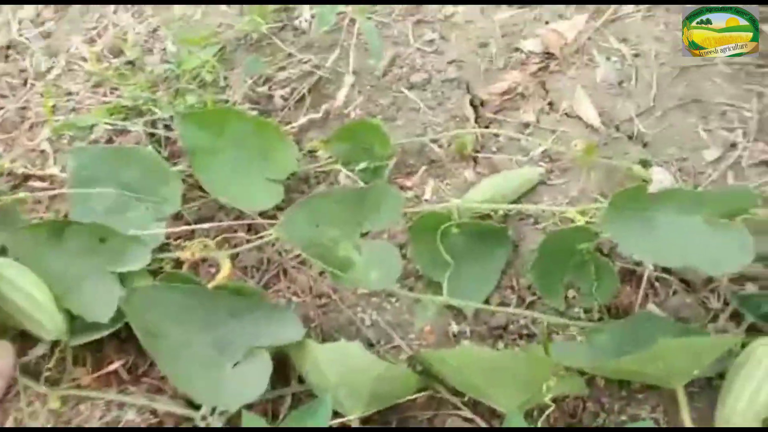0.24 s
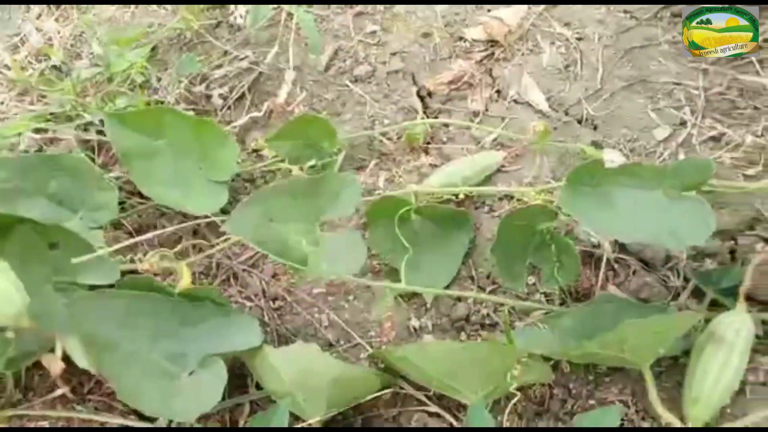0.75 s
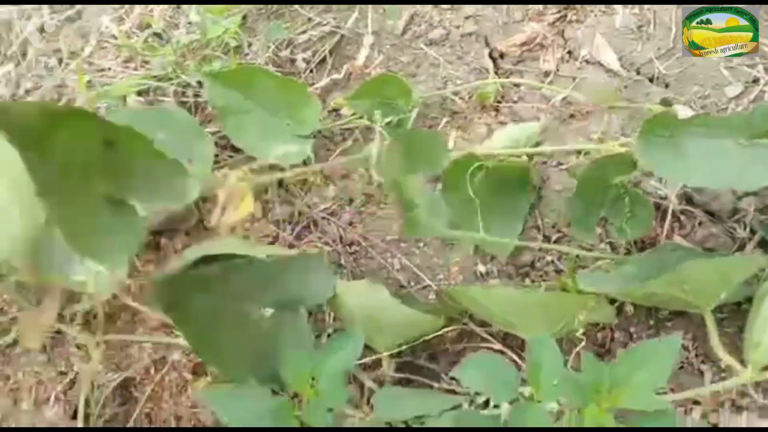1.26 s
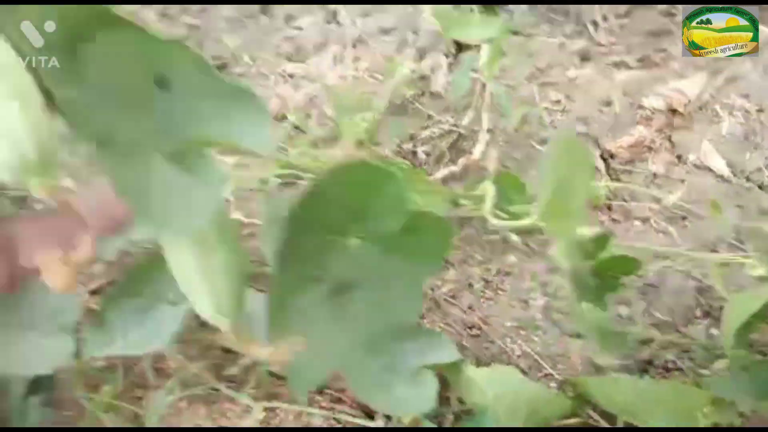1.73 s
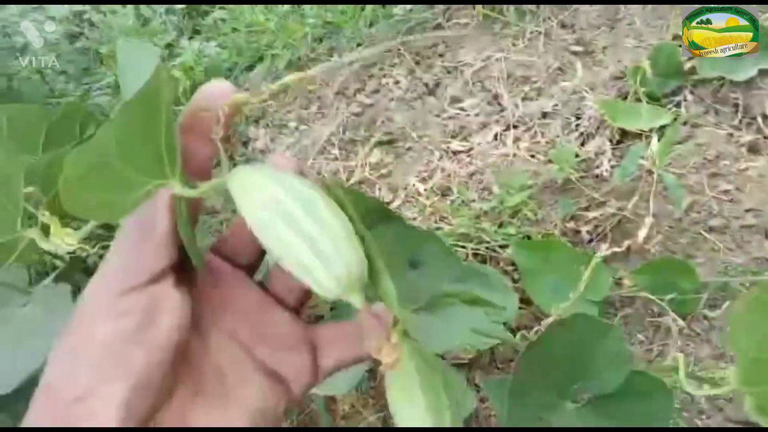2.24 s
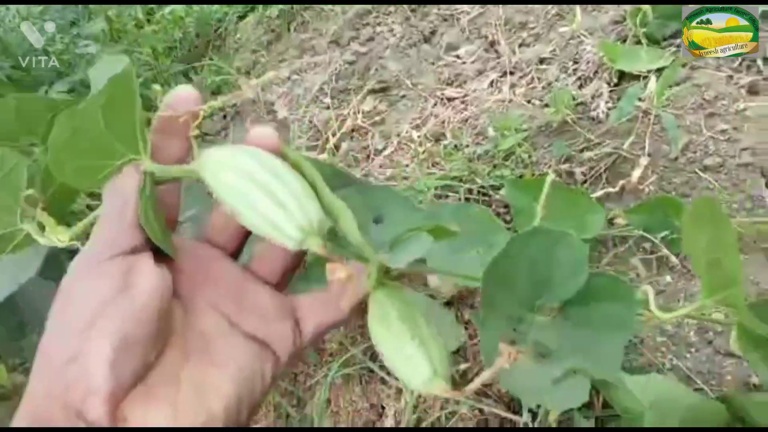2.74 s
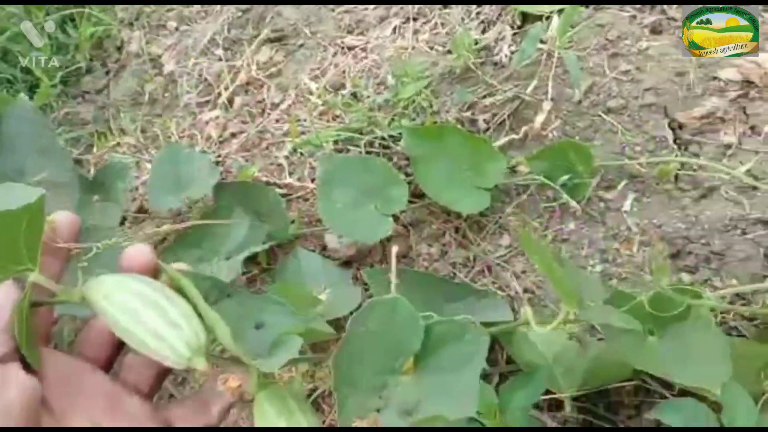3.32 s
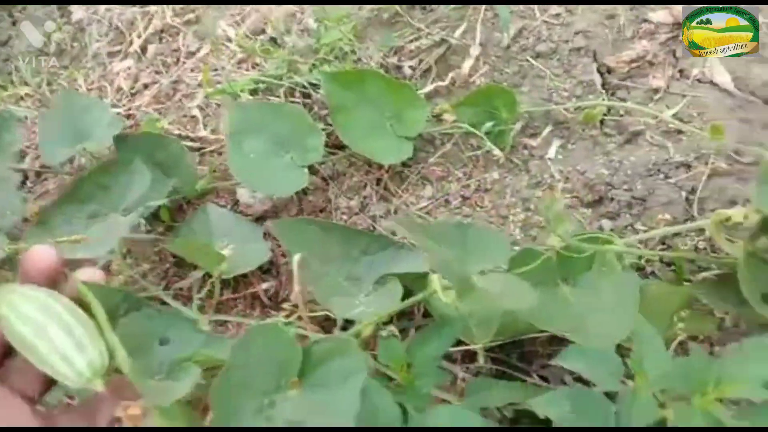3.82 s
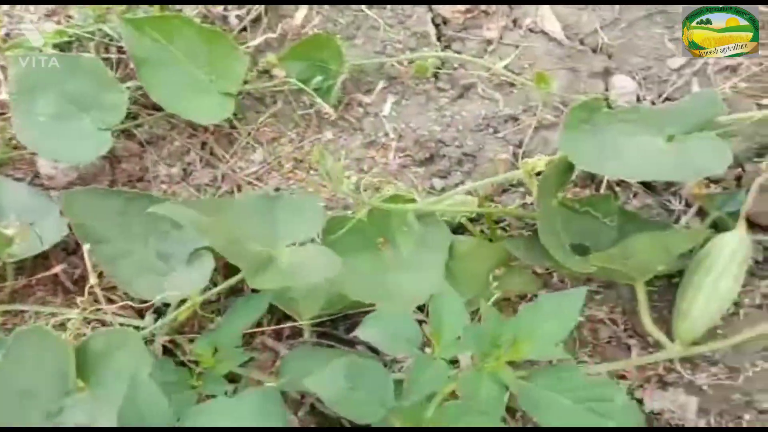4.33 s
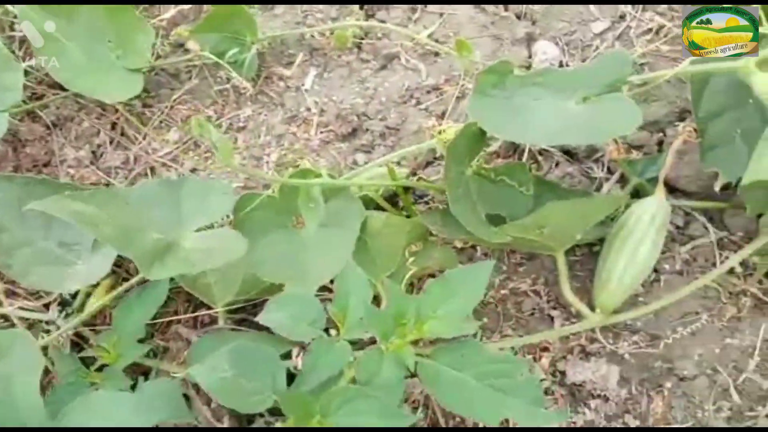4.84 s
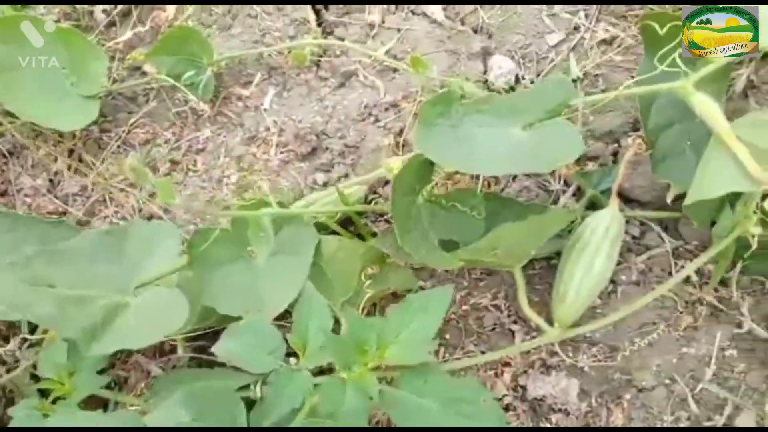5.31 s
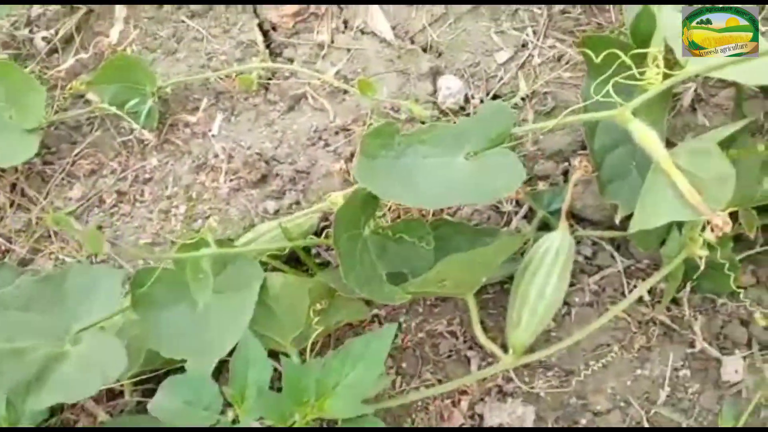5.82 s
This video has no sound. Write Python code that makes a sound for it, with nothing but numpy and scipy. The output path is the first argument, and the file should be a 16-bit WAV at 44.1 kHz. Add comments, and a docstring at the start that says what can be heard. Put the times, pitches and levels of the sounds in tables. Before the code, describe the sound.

Close, dry leaf handling in an open field: short scrapes with crackling fibres and twig-like snaps crowd the first second and a half, then thin to sparse faint ticks. Midway, a tiny hollow knock and a brief squeaky creak follow a few snaps. Steady fluttering insects, quiet air, a soft low wind thump on the microphone and distant chirping birds fill the calmer remainder, with no reverberant room sound.

```python
"""A hand pushes into a gourd vine on dry ground, lifts a fruit and lets it down again.
Leaves scrape as trains of tiny slips that ring the blade; dry bits snap as resonant click clusters.
A stem creaks by stick-slip through gliding resonances, and the fruit knocks as a short hollow ring.
Faint litter ticks and far whistling birds lie behind, with insects as a fluttering band of noise.
Shaped noise makes the still air and the light wind that bumps the microphone."""
import sys
import numpy as np
from scipy import signal
from scipy.fft import rfft, irfft, next_fast_len
from scipy.io import wavfile

SR = 44100
rng = np.random.default_rng(int(sys.argv[2]) if len(sys.argv) > 2 else 0)


def to_wav(s):
    """Save 16-bit WAV."""
    ch = np.atleast_2d(s).T  # columns
    pcm = np.round(np.clip(ch, -1, 1) * 32767)  # PCM
    wavfile.write(sys.argv[1], SR, pcm.astype(np.int16))


N = 267334
TIME = np.arange(N) / SR


def vine(scatter_db=-14):
    """Everything that the hand disturbs, with a short scatter from the ground."""
    close = leaf_strokes() + snaps()
    add(close, *creak())
    add(close, *knock())
    return close + gain_of(scatter_db) * echoes(close, 0.039)


# leaves sliding, one stroke per row: start_s, rise_s (time to full pressure), length_s,
# level_db (at full pressure), pitch_hz (of the leaf), hiss_db (treble lift from the leaf hairs)
LEAF_STROKES = [(0.021, 0.024, 0.037, -59, 3030, 8), (.19, .01, 0.035, -64.5, 1950, -20),
                (0.273, 0.0028, 0.06, -51, 1970, -25), (0.306, 0.018, 0.059, -46, 1530, -10),
                (0.369, 0.023, 0.13, -50, 1700, -9), (0.492, .002, 0.037, -35.5, 1940, -0.5),
                (0.529, .07, 0.15, -41.5, 2050, -2.5), (0.671, .01, 0.054, -48, 1760, -20),
                (.782, 0.0047, 0.097, -54, 1980, 11.5), (0.884, 0.0069, 0.034, -47, 1950, -34),
                (0.976, 0.013, .058, -41, 2170, 0.5), (1.051, .01, 0.1, -55.5, 1970, 3),
                (1.145, 0.034, 0.097, -40, 2150, 7), (1.239, 0.067, 0.075, -33, 2670, -2),
                (1.324, .024, 0.093, -30.5, 1980, 3), (1.584, 0.036, 0.041, -49.5, 3080, -5),
                (1.634, 0.0083, 0.041, -41.5, 2650, -4.5), (1.688, 0.006, 0.016, -50.5, 3130, -14),
                (1.807, .01, 0.087, -63.5, 3800, 5), (2.043, .004, 0.027, -57, 3640, 2),
                (2.112, 0.0027, 0.018, -63, 2840, 4), (2.358, 0.014, 0.055, -62.5, 3470, 5),
                (2.574, .01, 0.089, -68, 2110, 5), (2.886, 0.0092, 0.033, -66, 3080, -14),
                (3.297, 0.0046, 0.053, -55, 3430, 7), (4.078, .01, 0.058, -68, 2250, -3),
                (4.322, 0.0077, 0.097, -69.5, 2380, -7), (5.005, .015, 0.08, -66, 1685, 2.5),
                (5.177, .08, 0.097, -58, 2940, 4), (5.239, .06, .08, -57, 1860, 2),
                (5.33, 0.0093, 0.06, -64.5, 1920, 12)]


def leaf_strokes():
    """Leaves dragged over each other, with fibres crackling under the pressure."""
    out = np.zeros(N)
    for start_s, rise_s, length_s, level_db, pitch_hz, hiss_db in LEAF_STROKES:
        add(out, *stroke(start_s, rise_s, length_s, level_db, pitch_hz, hiss_db))
        for crackle in crackles(start_s, rise_s, length_s, level_db, pitch_hz):
            add(out, *snap(*crackle))
    return out


FIRM_DB, LIGHT_RANGE_DB = -38.5, 12  # a touch this far under a firm one only grazes the leaf
SWELL_DB, SAG_DB_PER_S = 7, 24.5  # pressure builds, then eases while the leaf slides
LET_GO_DB, SETTLE_DB_PER_S, SETTLE_S = 8.5, 174, .2  # the leaf slips free and rustles to rest
# colour of the rubbed leaves: freq_hz, level_db (relative)
LEAF_COLOUR = [(120, -40), (230, -30), (330, -13.5), (430, -25), (600, -8), (790, -5.5), (1030, -12),
               (1330, -3), (2400, -0.5), (2950, -7.5), (3650, -1.5), (6300, -13.5), (9700, -11),
               (13500, -27), (15500, -17.5)]


def stroke(start_s, rise_s, length_s, level_db, pitch_hz, hiss_db,
           body_db=6, soft_body_db=7, octaves=0.55, soft_octaves=0.28, tick=0.49, ring_s=0.004,
           shift_db=9, judder_db=2, soft_s=0.0053, free_s=0.0094, landing=0.15, dull_db=-9):
    """Slips ring three wandering patches of the blade; hair hiss dulls once the leaf slips free."""
    t = np.arange(round((length_s + SETTLE_S) * SR)) / SR
    # a light touch starts softly and rings mostly the leaf's own pitch
    light = np.clip((FIRM_DB - level_db) / LIGHT_RANGE_DB, 0, 1)
    contact = np.minimum(t / (landing * rise_s + light * soft_s), 1)

    held_s = np.maximum(t - rise_s, 0)
    swell_db = SWELL_DB * np.maximum(1 - t / rise_s, 0)
    pressure_db = level_db - swell_db - SAG_DB_PER_S * held_s + judder_db * wander(t, 157.9)
    freed_s = np.maximum(t - length_s, 0)
    free = np.minimum(freed_s / free_s, 1)
    release_db = LET_GO_DB * free + SETTLE_DB_PER_S * freed_s

    # the contact wanders from patch to patch
    weights = gain_of(shift_db * np.array([wander(t, 24.9) for _ in range(3)]))
    weights /= np.linalg.norm(weights, axis=0)
    trains = [weight * slips(t, 2200 - 1600 * light, 3.3) for weight in weights]
    patches = [signal.fftconvolve(train, blade(ring_s))[:len(t)] for train in trains]
    scrape = unit_rms(sum(patches)) + tick * unit_rms(sum(trains))

    def rubbed(treble_db):
        """The slips in the colour of this leaf."""
        def blade_db(f):
            away = np.log2((f + 1) / pitch_hz)
            body = body_db * np.exp(-.5 * (away / octaves) ** 2)
            soft_body = light * soft_body_db * np.exp(-.5 * (away / soft_octaves) ** 2)
            treble = treble_db * f ** 6 / (f ** 6 + 6500. ** 6)  # shelf centred on 6.5 kHz
            return read(LEAF_COLOUR, f) + body + soft_body + treble
        return unit_rms(colour(scrape, blade_db))

    sound = (1 - free) * rubbed(hiss_db) + free * rubbed(hiss_db + dull_db)
    return start_s, sound * gain_of(pressure_db - release_db) * contact


def slips(t, per_s, spread_db):
    """Tiny catches of leaf on leaf: impulses of random sign, many small, a few large."""
    size = gain_of(spread_db * np.minimum(rng.exponential(1, len(t)), 4))
    return size * rng.choice([-1, 1], len(t)) * (rng.random(len(t)) < per_s / SR)


def blade(ring_s):
    """One patch of leaf: dense modes as a noise burst that decays to 1/e in ring_s."""
    t = np.arange(SR // 40) / SR
    return unit_rms(rng.standard_normal(len(t)) * np.exp(-t / ring_s))


CRACKLES_PER_S = 30  # while a stroke presses fully
CRACKLE_DB, CRACKLE_SPREAD_DB = 4.5, 21.5  # loudest peak relative to the stroke, range below it


def crackles(start_s, rise_s, length_s, level_db, pitch_hz, octaves=1.0, count=12):
    """Small fibres break by chance under full pressure: rows of (start_s, peak_db, pitch_hz)."""
    held_s = length_s - rise_s
    rows = []
    for chance, when, size, pitch in rng.random((count, 4)):
        if chance < CRACKLES_PER_S * held_s / count:
            peak_db = level_db + CRACKLE_DB - CRACKLE_SPREAD_DB * size
            rows.append((start_s + rise_s + when * held_s, peak_db,
                         pitch_hz * 2 ** (octaves * (pitch - .5))))
    return rows


# dry bits snapping: start_s, peak_db (before the shared trim), pitch_hz
DRY_SNAPS = [(0.103, -52.5, 4100), (0.2772, -44, 2170), (.4188, -34, 1750), (0.4574, -33.5, 1410),
             (0.5093, -22.5, 1420), (.5397, -28.5, 2360), (.7143, -35, 1780), (0.7926, -42, 1940),
             (0.8933, -30, 1860), (.986, -25.5, 2170), (1.022, -27.5, 2070), (1.0856, -39, 1890),
             (1.2424, -24, 1780), (1.3029, -17, 2600), (1.6108, -35, 3380), (1.6448, -29.5, 3730),
             (1.6527, -22, 3280), (1.8602, -43.5, 3660), (2.191, -55, 1020), (2.3882, -46, 3380),
             (2.996, -45, 2245), (3.1365, -52, 4940), (3.3029, -36.5, 3010), (3.3235, -30.5, 3170),
             (3.333, -36, 3030), (3.344, -42, 3750), (4.4498, -52.5, 2800), (5.0267, -45, 1440),
             (5.3094, -46, 1956), (5.3744, -50, 1950)]


def snaps(trim_db=-1):
    """Dry bits of the vine break one by one."""
    out = np.zeros(N)
    for start_s, peak_db, pitch_hz in DRY_SNAPS:
        add(out, *snap(start_s, peak_db + trim_db, pitch_hz))
    return out


def snap(start_s, peak_db, pitch_hz, width_hz=500, crack=0.11, crumble_s=0.0034, edge_hz=5200):
    """A fibre breaks in a quick burst that rings the leaf; the soft blade damps the highs."""
    breaks = blade(crumble_s)
    broad = resonate(np.diff(breaks, prepend=0), pitch_hz, 3 * width_hz)
    ring = unit_rms(resonate(broad, pitch_hz, width_hz))
    ring = signal.sosfilt(signal.butter(4, edge_hz, fs=SR, output="sos"), ring)
    sound = ring + crack * unit_rms(colour(breaks, lambda f: read(LEAF_COLOUR, f)))
    return start_s, gain_of(peak_db) * sound / abs(sound).max()


CREAK_S, CREAK_LENGTH_S = 3.427, .22
CREAK_DB, CREAK_FADE_DB = -46.5, 21.5  # level before jerks and fade, total fade
# the lowest resonance sinks until BEND_S, then climbs back and slightly past its start
STEM_START_HZ, STEM_BENT_HZ, BEND_S = 2300, 1820, 0.087
CATCHES_PER_S, CATCH_DROP_DB = 27, 8.5  # the stem gives way in jerks, each loudest at its start
# upper resonances of the stem at its deepest bend: freq_hz, width_hz, level_db (relative)
STEM_MODES = [(3070, 220, -6.5), (3950, 270, -8.5), (5850, 750, -22)]


def creak(slips_per_s=190, uneven=0.28, grit=0.43, width_hz=320, follow=0.24, jerk_rise=0.084,
          fade_power=2.44):
    """A stem sticks and slips; its resonances sink and rise as it bends, the lowest one most."""
    t = np.arange(round(CREAK_LENGTH_S * SR)) / SR
    jerk_db = CATCH_DROP_DB * np.interp(t * CATCHES_PER_S % 1, [0, jerk_rise, 1], [1, 0, 1])
    level_db = CREAK_DB - jerk_db - CREAK_FADE_DB * (t / CREAK_LENGTH_S) ** fade_power
    lowest_hz = STEM_START_HZ + (STEM_BENT_HZ - STEM_START_HZ) * np.sin(np.pi / 2 * t / BEND_S)

    # every slip is a click and a short scrape, with wandering strength
    turns = np.cumsum(slips_per_s * np.exp(uneven * wander(t, 200))) / SR
    clicks = np.diff(np.floor(turns), prepend=0)
    scrapes = grit * rng.standard_normal(len(t)) * np.exp(-(turns % 1) / .5)
    drive = (clicks + scrapes) * gain_of(1.5 * wander(t, 150))

    bend = (lowest_hz / lowest_hz.min()) ** follow
    modes = [(lowest_hz, width_hz, 0)] + [(hz * bend, width, db) for hz, width, db in STEM_MODES]
    stem = 0
    for hz, width, db in modes:
        stem = stem + gain_of(db) * unit_rms(resonate(resonate(drive, hz, width), hz, width))
    return CREAK_S, gain_of(level_db) * unit_rms(stem)


def knock(start_s=3.318, peak_db=-51, pitch_hz=1130, width_hz=160, ring_s=0.023):
    """The fruit bumps against the vine: a noise burst through a resonance, small and hollow."""
    t = np.arange(SR // 10) / SR
    bump = rng.standard_normal(len(t)) * np.exp(-t / ring_s)
    sound = resonate(resonate(bump, pitch_hz, 3 * width_hz), pitch_hz, width_hz)
    return start_s, gain_of(peak_db) * sound / abs(sound).max()


def settling(loudest_db=-64, count=55):
    """Faint stray ticks of the litter under the vine, each with its own pitch."""
    out = np.zeros(N)
    for when, size, pitch in rng.random((count, 3)):
        add(out, *snap(when * N / SR, loudest_db - 8 * size, 750 * 7 ** pitch,
                       width_hz=115, crack=0.069, crumble_s=0.008))
    return out


# distant birds: start_s, length_s, pitch_hz (at the start), glide_hz (over the chirp),
# level_db (before the mix of direct sound and echo)
BIRD_CHIRPS = [(2.412, 0.071, 902, -50, -71.5), (3.56, .06, 4430, -68, -69), (3.616, 0.11, 3900, -650, -71),
               (3.895, 0.11, 3480, -830, -72), (3.986, 0.064, 3500, -170, -70),
               (4.046, 0.064, 2960, -140, -69), (4.385, 0.045, 4980, -140, -61.5),
               (4.51, 0.058, 4910, -82, -64.5), (4.956, 0.033, 5470, -38, -66),
               (5.145, .037, 3900, 160, -62), (5.172, 0.025, 4700, -120, -64), (5.26, 0.045, 5300, 2, -74),
               (5.408, 0.033, 4520, 320, -61.5), (5.41, 0.091, 2450, 193, -68.5),
               (5.486, 0.094, 3860, -195, -52.5), (5.568, 0.058, 3790, -130, -61),
               (5.674, .047, 3030, -15, -69.5), (5.975, 0.051, 5350, 100, -69)]


def birds(waver=0.016, direct=0.75, wet=0.35, far_db=-75, count=36):
    """Short wavering sine whistles, blurred by echoes; fainter ones come at random from farther away."""
    far = []
    for when, low, rise in rng.random((count, 3)):
        far.append((when * N / SR, .035, 5600 - 3200 * low ** 2, 400 * (rise - .5), far_db))
    out = np.zeros(N)
    for start_s, length_s, pitch_hz, glide_hz, level_db in BIRD_CHIRPS + far:
        t = np.arange(round(length_s * SR)) / SR
        hz = (pitch_hz + glide_hz * t / length_s) * (1 + waver * wander(t, 500))
        whistle = np.sin(2 * np.pi * np.cumsum(hz) / SR) * signal.windows.tukey(len(t), .7)
        add(out, start_s, gain_of(level_db) * unit_rms(whistle))
    return direct * out + wet * echoes(out, 0.24)


# colour of the insect chorus: freq_hz, level_db (relative)
INSECT_COLOUR = [(5700, -45), (6200, -36.5), (6500, -11.5), (7150, -6.5), (7650, -4), (8200, -7.5),
                 (8850, -6), (9250, -16), (9900, -26), (11200, -36), (13500, -52), (15000, -27.5),
                 (16000, -65)]
# loudness of the chorus before its flutter: time_s, level_db
INSECT_LEVEL = [(0, -57.5), (2.3, -58), (3.8, -60), (4.7, -58.5), (5.4, -60.5), (6.06, -58.5)]


def insects(flutter_db=1.0):
    """Many insects merge into one high band of noise with a fine, uneven flutter."""
    time_s, level_db = np.transpose(INSECT_LEVEL)
    chorus_db = np.interp(TIME, time_s, level_db) + flutter_db * wander(TIME, 400)
    return noise(INSECT_COLOUR) * gain_of(chorus_db)


BREEZE_DB, BREEZE_SWING_DB, BREEZE_PER_S = -77, 6, 6.5  # the light air between the puffs
# colour of still air outdoors: freq_hz, level_db (relative)
AIR_COLOUR = [(20, -37), (45, -22), (75, -2.5), (130, 1.5), (240, -7), (480, -16), (1050, -18), (1400, -13),
              (2600, -14.5), (4200, -16.5), (5400, -14.5), (7000, -10), (11000, -36.5), (16000, -35)]
# colour of wind on the microphone: freq_hz, level_db (relative)
WIND_COLOUR = [(20, -38), (40, -4.5), (55, 1.5), (80, 5), (110, -3), (160, -12), (230, -28.5), (400, -44),
               (900, -99)]
# puffs of wind on the microphone: peak_s, half_width_s (to 1/e of the peak), level_db
WIND_PUFFS = [(1.202, 0.16, -70), (2.31, .05, -63.5), (2.548, 0.062, -45), (2.73, 0.15, -57.5),
              (3.22, 0.078, -60.5), (4.888, 0.073, -63), (5.35, 0.13, -60), (5.73, 0.044, -61.5),
              (6.02, 0.11, -57.5)]


def air(still_db=-68):
    """Soft outdoor wash; a restless breeze and swelling puffs of wind rumble on the microphone."""
    still = noise(AIR_COLOUR) * gain_of(still_db + 0.11 * wander(TIME, 11))
    breeze = gain_of(BREEZE_DB + BREEZE_SWING_DB * wander(TIME, BREEZE_PER_S))
    puffs = sum(gain_of(level_db) * np.exp(-((TIME - peak_s) / half_width_s) ** 2)
                for peak_s, half_width_s, level_db in WIND_PUFFS)
    return still + noise(WIND_COLOUR) * np.hypot(breeze, puffs)


def echoes(x, t60_s):
    """Scatter from ground and plants: sparse random taps after 3 ms that fall 60 dB in t60_s."""
    t = np.arange(SR // 2) / SR
    sparse = (rng.random(len(t)) < 2000 / SR) * (t > .003)
    taps = rng.standard_normal(len(t)) * sparse * gain_of(-60 * t / t60_s)
    return signal.fftconvolve(x, taps / np.linalg.norm(taps))[:N]


def resonate(x, hz, width_hz):
    """A one-pole resonance that may follow a pitch curve: shift to 0 Hz, smooth, shift back."""
    turn = np.exp(2j * np.pi * np.cumsum(hz * np.ones(len(x))) / SR)
    r = np.exp(-np.pi * width_hz / SR)
    return 2 * (turn * signal.lfilter([1 - r], [1, -r], x / turn + 1e-18)).real


def colour(x, db_at):
    """Causal minimum-phase filter whose gain follows the function db_at(Hz)."""
    log_gain = np.log(gain_of(db_at(abs(np.fft.fftfreq(2048, 1 / SR)))))
    response = np.fft.ifft(np.exp(np.conj(signal.hilbert(log_gain)))).real
    return signal.fftconvolve(x, response[:len(response) // 2])[:len(x)]


def noise(spectrum):
    """Steady noise of a given colour, rms 1."""
    size = next_fast_len(N)
    gains = gain_of(read(spectrum, np.fft.rfftfreq(size, 1 / SR)))
    return unit_rms(irfft(rfft(rng.standard_normal(size)) * gains, size)[:N])


def wander(t, per_s):
    """Random drift of about unit size: per_s random points a second, joined by straight lines."""
    return np.interp((t - t[0]) * per_s, np.arange(4096), rng.standard_normal(4096))


def read(points, hz):
    """A spectrum table in dB, joined on a log-frequency axis."""
    f, db = np.transpose(points)
    return np.interp(np.log(hz + 1), np.log(f + 1), db)


def gain_of(db):
    """Decibels to amplitude."""
    return 10 ** (np.asarray(db) / 20)


def unit_rms(x):
    """Scales to rms 1."""
    return x / np.sqrt(np.mean(x ** 2) + 1e-20)


def add(mix, start_s, sound):
    """Mixes a sound in at start_s, cut off at the end of the mix."""
    part = mix[max(round(start_s * SR), 0):][:len(sound)]
    part += sound[:len(part)]


def scene():
    """The vine close by, the field around it."""
    return (vine() + settling() + birds() + insects() + air())[None]


EDGE_HZ = 15900


def record(dry):
    """The recorder's band limit: a steep linear-phase low-pass."""
    low_pass = signal.firwin(511, EDGE_HZ, window=("kaiser", 9), fs=SR)
    return signal.oaconvolve(dry, low_pass[None], "same")


dry = scene()
out = record(dry)
to_wav(out)
```